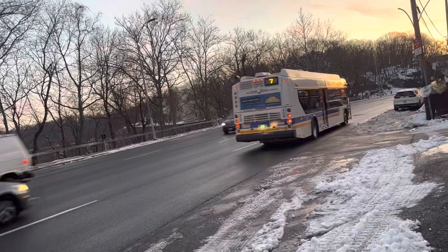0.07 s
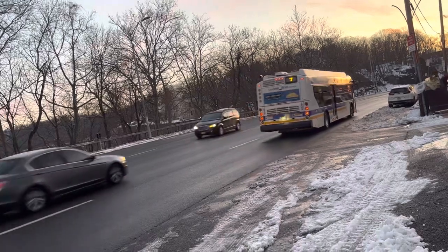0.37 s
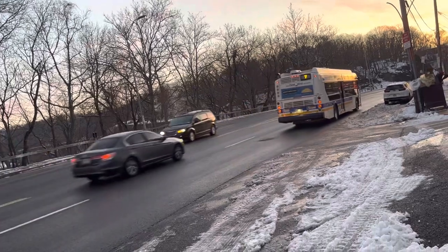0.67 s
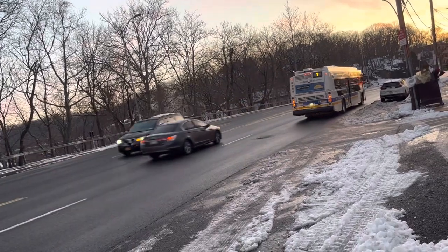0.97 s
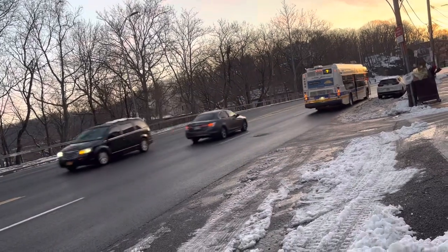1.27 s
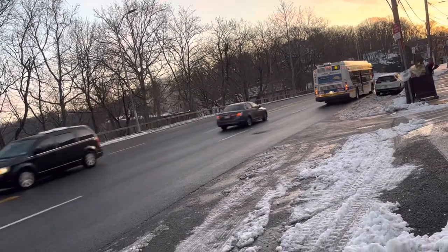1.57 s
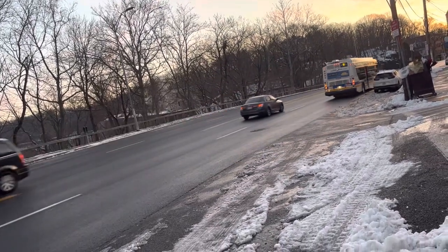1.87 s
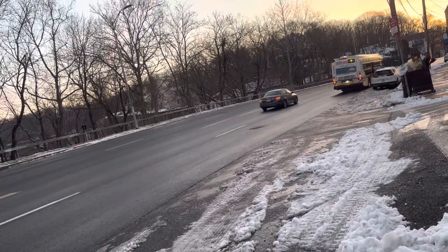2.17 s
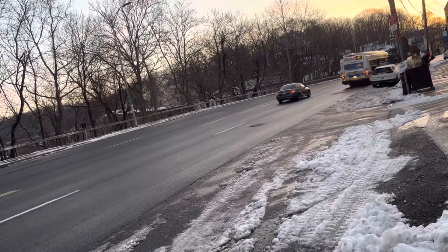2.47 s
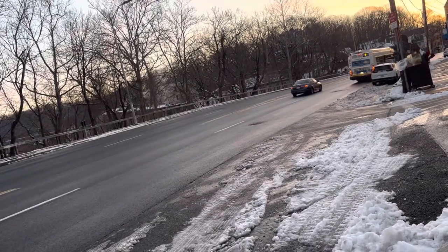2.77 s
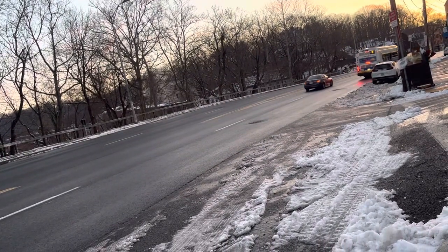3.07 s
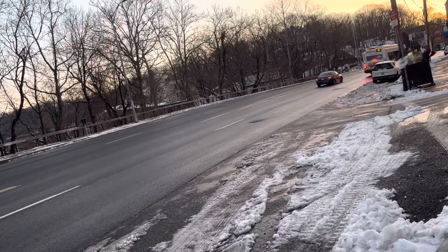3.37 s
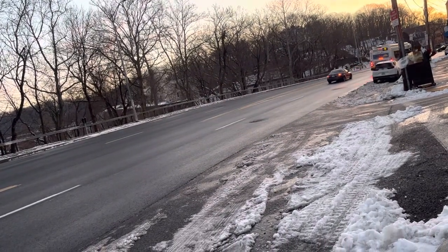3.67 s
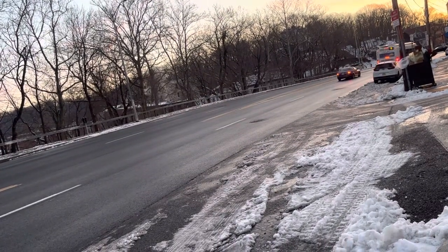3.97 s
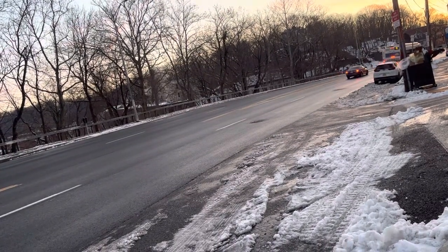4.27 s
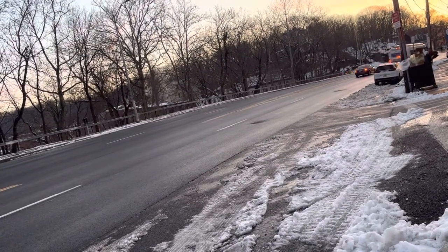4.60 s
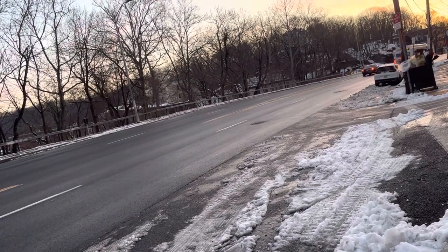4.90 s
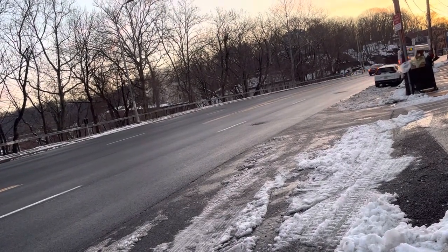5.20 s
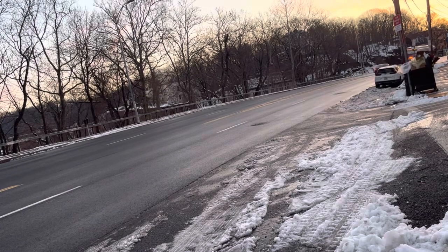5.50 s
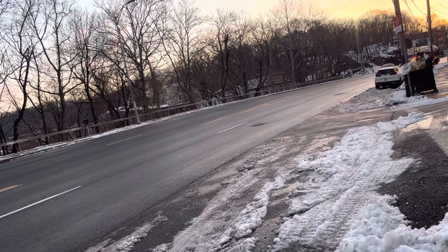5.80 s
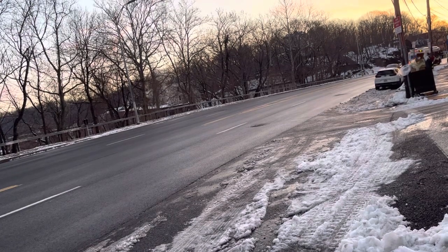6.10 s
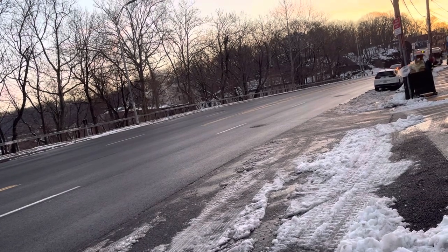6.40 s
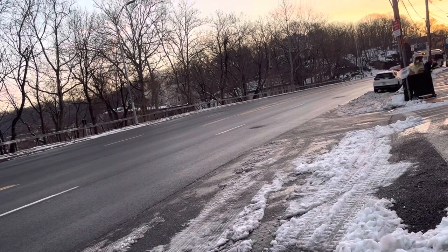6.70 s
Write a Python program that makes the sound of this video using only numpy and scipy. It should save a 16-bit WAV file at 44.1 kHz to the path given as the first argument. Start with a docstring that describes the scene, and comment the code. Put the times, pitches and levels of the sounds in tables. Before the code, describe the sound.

A car passes close on a wet road, tyres roaring and hissing with spray, wheels thumping over a dip. Meanwhile a bus pulls away with a low drone, a faint whistle and a hiss of air. A second car follows, a little softer, and the traffic recedes. In the second half light wind buffets the stereo microphone at the verge, and the distant bus briefly pulls again near the end.

```python
"""A wet road, heard from the verge through a stereo microphone with two ports.
At once a car passes close, tyres roaring and throwing up spray, while a bus pulls away, droning, with a
faint turbo whistle and a hiss of air. Wheels thump over a dip and car bodies drum on rough asphalt.
A second car passes at 1.5 s and a tyre flicks through a puddle. From 3.8 s light wind buffets the
microphone as the traffic fades round the bend; after 6 s, far off, the bus briefly pulls again."""
import sys
import numpy as np
from scipy import signal
from scipy.fft import rfft, irfft, next_fast_len
from scipy.io import wavfile
from scipy.ndimage import uniform_filter1d

SR = 44100
rng = np.random.default_rng(int(sys.argv[2]) if len(sys.argv) > 2 else 0)


def dump(signal):
    """Clip the signal to [-1, 1] and save it as 16-bit WAV at the path in sys.argv[1]."""
    limited = np.clip(np.atleast_2d(signal).T, -1, 1)
    pcm = np.round(limited * 32767).astype(np.int16)
    wavfile.write(sys.argv[1], SR, pcm)


N = 302085
TIME = np.arange(N) / SR
FRAME, HOP = 1024, 256
FRAME_S = np.arange(N // HOP + 5) * HOP / SR
BIN_HZ = np.fft.rfftfreq(FRAME, 1 / SR)


def gain_of(db):
    """Decibels to gain."""
    return 10 ** (np.asarray(db) / 20)


def unit_rms(x):
    """Scales to rms 1."""
    return x / np.sqrt(np.mean(x ** 2) + 1e-20)


def steady(x):
    """Holds the slow level of a stereo sound at 1."""
    return x / np.sqrt(uniform_filter1d(x.mean(0) ** 2, size=20000) + 1e-20)


def curve(rows, t=TIME):
    """Points joined by straight lines in time."""
    return np.interp(t, *np.transpose(rows))


def onset(s, takes_s):
    """A smooth step from 0 to 1 at time s."""
    return .5 + .5 * np.tanh((TIME - s) / (2 * takes_s))


def bell(centre, half_width, axis=TIME):
    """A bell of height 1, in time unless another axis is given."""
    return np.exp(-.5 * ((axis - centre) / half_width) ** 2)


def spectrum_db(rows, hz, column=1):
    """One column of a table, joined by straight lines in log frequency."""
    rows = np.array(rows, float)
    return np.interp(np.log(hz + 1), np.log(rows[:, 0] + 1), rows[:, column])


def filtered(x, gain):
    """Applies a gain given as a function of frequency."""
    size = next_fast_len(N + 4096)
    return irfft(rfft(x, size) * gain(np.fft.rfftfreq(size, 1 / SR)), size)[..., :N]


def highpass(hz, edge_hz, order=4):
    """Gain of a Butterworth high-pass."""
    return np.sqrt(1 - 1 / (1 + (hz / edge_hz) ** (2 * order)))


def noise(spectrum):
    """Noise of rms 1 with the given spectrum."""
    return unit_rms(filtered(rng.standard_normal(N), lambda hz: gain_of(spectrum_db(spectrum, hz))))


def wander(rate_hz):
    """Smooth random drift of rms 1."""
    coarse = signal.lfilter(*signal.butter(2, rate_hz, fs=500), rng.standard_normal(4000))
    return unit_rms(np.interp(TIME * 500 + 400, np.arange(4000), coarse))


def add(mix, s, sound):
    """Lays a sound into the mix at time s."""
    part = mix[round(s * SR):][:len(sound)]
    part += sound[:len(part)]


def mid_side(mid, side):
    """Left and right from middle and side."""
    return np.array([mid + side, mid - side])


# cars passing the microphone: closest t/s, level/dB, time to travel their distance from the verge/s
CAR_PASSES = [(.3, -0.01, 0.7), (1.55, -6, 0.82)]

def traffic_db(bend_s=4.28, bend_loss_db=3):
    """Level at the verge: each car falls with the square of its distance, and the bend hides the last."""
    power = sum(gain_of(db) ** 2 / (1 + ((TIME - s) / travel_s) ** 2) for s, db, travel_s in CAR_PASSES)
    return 10 * np.log10(power) - bend_loss_db * onset(bend_s, 0.13)


# how far off the traffic is: t/s, distance (0 near, 1 down the road, 2 beyond the bend)
TRAFFIC_DISTANCE = [(.8, 0.097), (2.0, 0.48), (2.7, 0.66), (3.2, 1.1), (4.4, 1.4), (5.15, 1.87),
                    (6.4, 1.73)]
# tread spectrum at those three distances: f/Hz, near level/dB, down the road level/dB, far level/dB
TREAD_SPECTRA = [(300, 1, -8, -11), (453, -1.7, -2.5, 0), (674, -1, -2, -6), (816, -0.5, 3.5, -1),
                 (950, 1, 0.6, -1.5), (1110, -0.6, -1, -3), (1170, -1, -1, 1), (1285, -3.5, -4.5, -3),
                 (1370, -7.5, -2.5, -3.5), (1500, -5.5, -4, -4.5), (1900, -9, -9, -11),
                 (2225, -12, -13, -13.5), (2570, -15.5, -17, -19), (3260, -16.5, -21, -22.5),
                 (3770, -17, -21, -21), (4100, -18, -19.5, -24.5), (4740, -15.5, -23, -16.5),
                 (5350, -20.5, -21.5, -21.5), (6160, -27, -28, -36), (6950, -55, -32, -67),
                 (15400, -83, -88, -58)]
# the wedge between tyre and road is a horn, louder aimed at the microphone and weaker turned away:
# t/s, half length/s, boost/dB, centre f/Hz, half width/octaves
TYRE_HORN_BEAMS = [(0.304, 0.2, 3, 3950, 0.22), (.75, 0.084, 3, 1140, .12), (1.355, 0.25, 2, 2090, 0.34),
                   (1.65, 0.26, 1, 1150, .15), (2.95, 0.26, 2, 1090, 0.29), (4.2, 0.45, 4.5, 2250, 0.32),
                   (4.3, .4, -1.5, 4050, 0.11), (6.8, 0.42, -3.5, 1860, 0.36)]
# the road at the two ports, a table per distance: f/Hz, likeness 0-1, left lead/rad, left over right/dB
STEREO_NEAR = [(300, 0.84, 0.4, -1), (450, 0.8, 0.7, 0), (600, 0.7, 1.0, 0), (850, 0.62, 2.1, 1),
               (950, 0.45, 1.8, 1), (1080, 0.52, 0.55, 0), (1200, .35, .6, -2), (1280, 0.4, 2.1, -2),
               (1450, .52, 2.5, -4), (1620, 0.5, 3.7, -2), (1700, 0.85, 0.3, 1.5), (2200, 0.85, 0.4, 1.5),
               (2600, 0.62, 0.6, 3), (2950, 0.5, 1, 6), (3300, .45, .6, 3), (3700, 0.36, 0.6, 4),
               (4150, 0.5, 0.1, 3), (4800, 0.44, 0.5, 7), (5400, 0.4, -0.5, 2), (6200, 0.73, -0.7, 3),
               (7300, 0.58, -2.2, 2)]
STEREO_AWAY = [(300, 0.7, 0.4, 0), (450, 0.5, 1.6, 0), (600, 0.58, 1.7, 0), (800, 0.9, 2.3, -1),
               (950, 0.55, 2.6, -1), (1030, .1, 3.3, -2), (1120, 0.3, -2, -3), (1280, 0.45, -1.8, -4.5),
               (1600, 0.55, -0.8, -3), (1700, 0.8, 0, 2), (2200, 0.82, -0.3, 1.5), (2600, 0.6, 0.4, 1),
               (3200, 0.29, 2, 3), (3700, 0.32, 1.5, 4), (4150, 0.2, -.7, 3), (4800, 0.29, 0.2, 6),
               (5400, 0.39, -0.7, 5), (6200, 0.5, -0.7, 4), (7300, 0.6, -2.2, 1)]
STEREO_FAR = [(300, 0.74, 0.1, -1), (450, 0.14, 1.5, 1), (600, 0.14, 0.9, 0), (800, 0.53, 2.7, 0),
              (950, 0.09, -3.0, 0), (1100, 0.2, -2.1, -1), (1280, 0.32, -2.1, -3), (1520, 0.51, -2.6, -3),
              (1850, 0.54, 1.3, 3), (2200, 0.29, -1.3, 2), (2600, 0.36, -1.0, 3), (3200, 0.21, 0.6, 5),
              (3700, 0.58, 1.5, 4), (4150, 0.48, 2.8, 2), (4800, 0.18, 1.2, 5), (5400, 0.27, -1.1, 2),
              (6200, 0.66, -1.2, 0), (7300, 0.77, -2.3, 0)]

def tread_noise(patchy_db=1.0):
    """Tread on asphalt at the two ports; colour and direction change as the cars recede."""
    distance = curve(TRAFFIC_DISTANCE, FRAME_S)[:, None]
    level_db = sum(db * np.outer(bell(s, half_s, FRAME_S), bell(np.log2(hz), width, np.log2(BIN_HZ + 1)))
                   for s, half_s, db, hz, width in TYRE_HORN_BEAMS)
    coherence = balance_db = 0
    for k, table in enumerate((STEREO_NEAR, STEREO_AWAY, STEREO_FAR)):
        share = np.maximum(1 - abs(distance - k), 0)
        hz, likeness, lead, left_db = np.transpose(table)
        lag = np.exp(-1j * np.interp(BIN_HZ, hz, np.unwrap(lead)))
        level_db += share * spectrum_db(TREAD_SPECTRA, BIN_HZ, column=k + 1)
        coherence += share * np.interp(BIN_HZ, hz, likeness) * lag
        balance_db += share * np.interp(BIN_HZ, hz, left_db)
    shape = level_db.shape
    left, unrelated = (rng.standard_normal(shape) + 1j * rng.standard_normal(shape) for _ in range(2))
    right = coherence * left + np.sqrt(np.maximum(1 - abs(coherence) ** 2, 0)) * unrelated
    asphalt = uniform_filter1d(rng.standard_normal(shape), size=12, axis=0)  # uneven in time
    asphalt = unit_rms(uniform_filter1d(asphalt, size=3, axis=1))  # and in frequency
    ports = np.array([left * gain_of(balance_db / 2), right * gain_of(-balance_db / 2)])
    ports *= gain_of(level_db + patchy_db * asphalt)
    return signal.istft(ports.swapaxes(1, 2), nperseg=FRAME, noverlap=FRAME - HOP)[1][:, :N]


def tyres(low_hz=350, spray_hz=2800, top_hz=7600, drier_s=2.35):
    """The tread roars, and the water flung from it hisses, less so past the wettest stretch."""
    tread = tread_noise()
    treble = filtered(tread, lambda hz: highpass(hz, spray_hz) ** 2)
    spray = filtered(treble, lambda hz: 1 - highpass(hz, top_hz, order=6) ** 2)
    roar = filtered(tread - treble, lambda hz: highpass(hz, low_hz))
    passing_db = traffic_db() + 1.6 * bell(2.93, 0.097)  # a brief swell down the road
    roar_db = -27.5 + 0.92 * passing_db
    spray_db = -44 + 0.83 * passing_db - 4 * onset(drier_s, 0.047)
    return steady(roar) * gain_of(roar_db) + steady(spray) * gain_of(spray_db)


# spectrum of engines and car bodies from the verge: f/Hz, level/dB
RUMBLE_SPECTRUM = [(15, -42), (25, -15), (38, -1.5), (60, 4), (128, -1.5), (173, 0.5), (205, -3), (231, -6),
                   (258, -5.5), (320, -9), (362, -10.5), (450, -17.5), (580, -31), (990, -120)]

def rumble(wide_hz=650):
    """Engines and car bodies rumble; the deepest part is nearly the same at both ports."""
    side = filtered(noise(RUMBLE_SPECTRUM), lambda hz: np.minimum(hz / wide_hz, 0.95))
    return mid_side(noise(RUMBLE_SPECTRUM), side) * gain_of(-26.5 + 0.76 * traffic_db())


def car_exhausts(receding_hz=51.4, doppler_hz=5.5, beat_hz=1, rough=0.86, fade_db_per_s=19):
    """Two exhausts boom at the firing rate and beat; one overtone swells as a car goes by."""
    firing_hz = receding_hz + doppler_hz * np.exp(-TIME ** 2)
    phase = 2 * np.pi * np.cumsum(firing_hz * (1 + 0.0171 * wander(11.3))) / SR
    boom = unit_rms(np.sin(phase) * (1 + rough * wander(14)))
    overtone = unit_rms(np.sin(7 * phase) * (1 + rough * wander(13)))
    beat = 1 + 0.41 * np.cos(2 * np.pi * beat_hz * (TIME - 1))  # in step at 1 s
    boom_db = -42 - fade_db_per_s * np.maximum(TIME - 2.6, 0)
    oncoming = gain_of(-36) * bell(1.45, 0.07)
    return boom * beat * gain_of(boom_db) + overtone * (gain_of(-46.5 + traffic_db()) + oncoming)


# the bus pulls away, eases off, and pulls again briefly: t/s, throttle 0-1
BUS_THROTTLE = [(1.2, 1), (1.85, 0.9), (2.3, 0.3), (5.7, 0.16), (6.35, 0.87), (6.85, 0.07)]

def bus_gain(full_db, ease_db, falloff, doubling_s=1.6):
    """A sound of the bus follows its throttle and sinks as it leaves the microphone at steady speed."""
    distance_db = 20 * np.log10(1 + TIME / doubling_s)
    return gain_of(full_db - ease_db * (1 - curve(BUS_THROTTLE)) - falloff * distance_db)


# six cylinders, firing three times a turn: multiple of the crankshaft rate, level/dB
ENGINE_ORDERS = [(3, -8), (4, -1.5), (5, -4), (9, -1.5), (12, -0.5)]

def bus_engine(cruise_hz=19.22, sag_s=4.9, sag_hz_per_s=0.62, flutter=0.35):
    """Crankshaft orders drone, each fluttering as its path along the road changes."""
    crank_hz = cruise_hz - sag_hz_per_s * np.maximum(TIME - sag_s, 0)
    turns = np.cumsum(crank_hz * (1 + 0.0019 * wander(3.93))) / SR
    drone = sum(gain_of(db) * (1 + flutter * wander(5)) * np.sin(2 * np.pi * (k * turns + rng.random()))
                for k, db in ENGINE_ORDERS)
    return unit_rms(drone) * bus_gain(full_db=-32, ease_db=10, falloff=0.38)


# tones of the bus's turbo: starting f/Hz, starting level/dB, end t/s
TURBO_TONES = [(4378, -52, 1.15), (4520, -57, .55)]

def turbo_whistle(rise_hz_per_s=16, fade_db_per_s=7):
    """The turbo whistles thinly, left of centre; its tones creep up, fade and stop."""
    whistle = 0
    for hz, db, until_s in TURBO_TONES:
        turns = np.cumsum((hz + rise_hz_per_s * TIME) * (1 + .0011 * wander(30))) / SR
        tone = unit_rms(np.sin(2 * np.pi * turns) * (1 + .25 * wander(7.8)))
        whistle += tone * gain_of(db - fade_db_per_s * TIME) * (1 - onset(until_s, .15))
    return whistle * gain_of([[2], [-2]])


# hiss at the two ports: f/Hz, likeness 0-1, left lead/rad, left over right/dB
STEREO_HISS = [(5600, .5, -.4, 2), (5900, .7, -.5, 3.5), (6400, .6, -1, 1.5), (6900, .7, -1.2, 2.5),
               (7350, .7, -2.3, 1), (7800, .999, -3.1, 0), (8900, .999, -3.2, 0), (9500, .7, -3.8, 0),
               (10200, .6, -5, 0), (11200, .98, -6.2, 0), (13000, .98, -6.3, 0), (13800, .55, -7.8, 0),
               (14700, .999, -9.4, 0)]

def roadside_hiss(spectrum):
    """Hiss from down the road, reaching the left port late."""
    hz, likeness, lead, left_db = np.transpose(STEREO_HISS)
    left = noise(spectrum)
    shared = filtered(left, lambda f: np.interp(f, hz, likeness) * np.exp(-1j * np.interp(f, hz, lead)))
    unrelated = filtered(noise(spectrum), lambda f: np.sqrt(1 - np.interp(f, hz, likeness) ** 2))
    ports = np.array([left, shared + unrelated])
    return filtered(ports, lambda f: gain_of(np.outer([.5, -.5], np.interp(f, hz, left_db))))


# spectrum of the bus's air hiss: f/Hz, level/dB
AIR_SPECTRUM = [(3000, -71), (5000, -27), (5600, 7), (5900, 10), (6350, 8), (6750, 8.5), (7300, 7.5),
                (8300, -17.5), (10000, -4.5), (14000, -28)]

def bus_air():
    """Air hisses with the throttle, and is lost to distance sooner than the drone."""
    return roadside_hiss(AIR_SPECTRUM) * bus_gain(full_db=-42, ease_db=8.5, falloff=1.33)


# wet patches along the lane: t/s, half length/s, mist level/dB, swish level/dB
WET_STRETCHES = [(0.065, 0.06, -47, -43), (0.292, 0.23, -48.5, -57), (1.313, 0.13, -48.5, -46),
                 (3.75, 0.053, -63, -69)]
# spectra of fine mist, and of water pressed from under a tyre: f/Hz, level/dB
MIST_SPECTRUM = [(2000, -72), (6000, -18), (8000, 7), (9800, 7), (11500, 4), (13000, 1), (15500, -6.5),
                 (18000, -30)]
SWISH_SPECTRUM = [(3000, -30), (5300, -6), (5950, 11), (6800, 0), (7600, -9), (9000, -62)]

def mist_and_swish(spatter=0.1):
    """Mist fizzes behind the cars and soon dies with distance; on wet patches it flares, with a swish."""
    mist_power = gain_of(-48 + 1.55 * traffic_db()) ** 2
    swish_power = 0
    for s, half_s, mist_db, swish_db in WET_STRETCHES:
        mist_power += (gain_of(mist_db) * bell(s, half_s)) ** 2
        swish_power += (gain_of(swish_db) * bell(s, half_s)) ** 2
    mist = roadside_hiss(MIST_SPECTRUM) * (1 + spatter * wander(120))
    return mist * np.sqrt(mist_power) + roadside_hiss(SWISH_SPECTRUM) * np.sqrt(swish_power)


# wheels striking a dip in the road: t/s, level/dB
WHEEL_HITS = [(0.262, -25), (0.284, -24), (0.4004, -11), (0.4143, -10), (0.615, -21), (1.765, -32),
              (2.083, -33)]
# modes of tyre and suspension: f/Hz, level/dB, time to fall 60 dB/s
WHEEL_MODES = [(53.5, -4, 0.25), (70, -1.5, 0.064), (98.3, 0, .2), (174, -17, .22), (253.5, -5.5, 0.2),
               (316.4, -8, .25), (364, -12.5, 0.23)]

def wheel_thumps(knock_db=-16, knock_hz=450, knock_s=0.0027, rise_s=.0003):
    """A wheel drops into a dip and hits its far edge: a short knock, then tyre and suspension ring."""
    t, out = TIME[:SR // 2], np.zeros(N)
    ring = sum(gain_of(db - 60 * t / t60) * np.sin(2 * np.pi * hz * t) for hz, db, t60 in WHEEL_MODES)
    knock = gain_of(knock_db) * np.exp(-t / knock_s) * np.sin(2 * np.pi * knock_hz * t)
    for s, db in WHEEL_HITS:
        add(out, s, -gain_of(db) * (ring + knock) * (1 - np.exp(-t / rise_s)))
    return out


# rough asphalt along the lane: t/s, half length/s, level/dB, centre f/Hz
ROUGH_STRETCHES = [(0.277, 0.029, -26.5, 223), (.52, .05, -32, 290), (1.81, 0.076, -33, 188),
                   (2.96, 0.15, -38, 100)]

def body_drumming(half_octaves=0.4):
    """A car body drums briefly on each rough stretch."""
    out = 0
    for s, half_s, db, hz in ROUGH_STRETCHES:
        body = filtered(rng.standard_normal(N), lambda f: bell(np.log2(hz), half_octaves, np.log2(f + 1)))
        out += unit_rms(body) * gain_of(db) * bell(s, half_s)
    return out


# a puddle down the road: t/s, level/dB, length/s
PUDDLES = [(2.275, -44, 0.063)]
# spectrum of its flung drops: f/Hz, level/dB
SPLASH_SPECTRUM = [(800, -50), (2500, 3), (3500, -1), (5000, -1), (6500, -6), (8000, -40), (14000, -35)]

def puddle_splash(spatter=0.1):
    """A tyre flicks through a puddle: a short burst of drops, different at each port."""
    out = np.zeros((2, N))
    for port in out:
        drops = noise(SPLASH_SPECTRUM) * (1 + spatter * wander(200))
        for s, db, length_s in PUDDLES:
            burst = drops[int(s * SR):][:int(length_s * SR)]
            add(port, s, gain_of(db) * burst * np.hanning(len(burst)))
    return out


# spectrum of turbulence right on the microphone: f/Hz, level/dB
WIND_SPECTRUM = [(20, -31), (45, 4.5), (70, 0.5), (115, 4), (170, -11), (270, -9.5), (400, -31), (800, -60),
                 (2500, -100)]
# single buffets: t/s, level/dB, eddy f/Hz, length/s, strength of a smaller whirl 0-1
WIND_BUFFETS = [(4.046, -14, 90, 0.034, 0.44), (4.095, -20.5, 79, 0.03, 0.5), (4.176, -27, 66, 0.022, 0),
                (4.507, -24.5, 66, 0.06, 0.3), (4.576, -23, 90.5, 0.033, 0.6),
                (4.674, -25, 125, 0.022, 0.2), (4.916, -22.5, 65.6, 0.056, 0.1),
                (5.153, -23, 86.6, 0.017, 0.54), (5.198, -25.5, 69, 0.027, 1),
                (5.758, -27.5, 55.3, 0.04, 0.2), (5.858, -32, 104, 0.029, 0.3),
                (6.611, -31.5, 99.7, 0.062, 0.1), (6.701, -34, 86, 0.031, 0.1),
                (6.776, -29.5, 76.4, 0.033, 0)]

def wind(start_s=3.82, fade_db_per_s=1.2, width=0.36, churn=0.17):
    """A lumpy breeze gets up and slackens; single eddies shake the air at the ports."""
    breeze_gain = gain_of(-34.5 - fade_db_per_s * (TIME - start_s)) * onset(start_s, 0.08)
    # stronger turbulence around each buffet
    wake_power = sum((gain_of(-34 + 0.27 * db) * bell(s, 0.11)) ** 2 for s, db, *_ in WIND_BUFFETS)
    breeze = mid_side(noise(WIND_SPECTRUM), width * noise(WIND_SPECTRUM))
    breeze *= np.sqrt(breeze_gain ** 2 + wake_power) * gain_of(0.5 * wander(8.3))
    turbulence, eddies = noise(WIND_SPECTRUM), np.zeros(N)
    for s, db, hz, length_s, whirl in WIND_BUFFETS:
        t = TIME[:int(length_s * SR)]
        swirl = np.sin(2 * np.pi * hz * t) + churn * turbulence[int(s * SR):][:len(t)]
        swirl += whirl * (1 - t / length_s) * np.sin(2 * np.pi * 3 * hz * t)  # strongest at the front
        add(eddies, s, gain_of(db) * swirl * signal.windows.tukey(len(t), .3))
    return breeze + eddies


def far_hiss(start_s=6.12, level_db=-70.5, spatter=0.1):
    """A faint high hiss, the colour of the mist, sets in far away."""
    fizz = roadside_hiss(MIST_SPECTRUM) * (1 + spatter * wander(120))
    return fizz * gain_of(level_db) * onset(start_s, 0.027)


def scene():
    """The road, the bus and the breeze from the verge; the bass leans slightly right."""
    bass = rumble() + bus_engine() + car_exhausts() + wheel_thumps() + body_drumming() + wind()
    wet_road = tyres() + mist_and_swish() + puddle_splash()
    return wet_road + turbo_whistle() + bus_air() + far_hiss() + bass * gain_of([[-0.32], [0.32]])


def record(dry, low_cut_hz=36, top_hz=15700):
    """The microphone's bass cut and band limit."""
    cut = signal.sosfilt(signal.butter(6, low_cut_hz, "highpass", fs=SR, output="sos"), dry)
    band_limit = signal.firwin(511, top_hz, window=("kaiser", 9), fs=SR)
    return signal.oaconvolve(cut, band_limit[None], "same")


dry = scene()
out = record(dry)
dump(out)
```